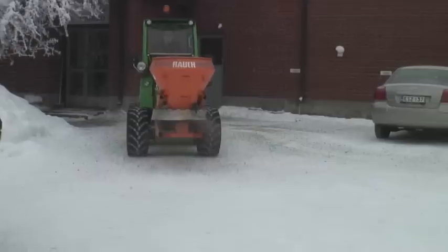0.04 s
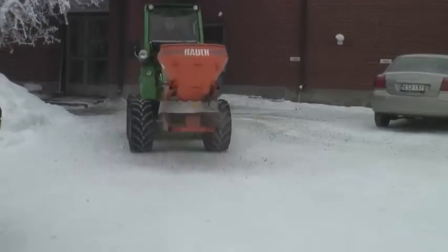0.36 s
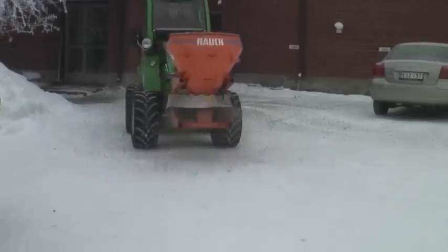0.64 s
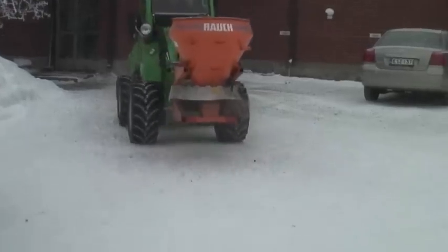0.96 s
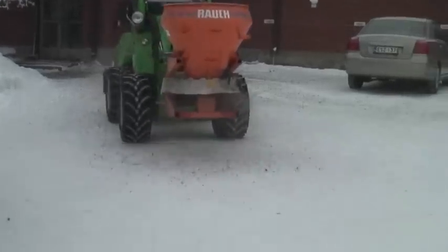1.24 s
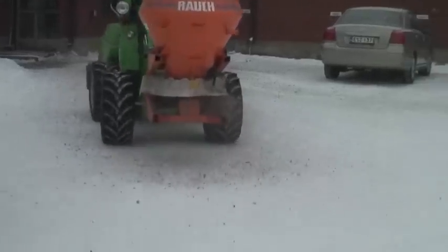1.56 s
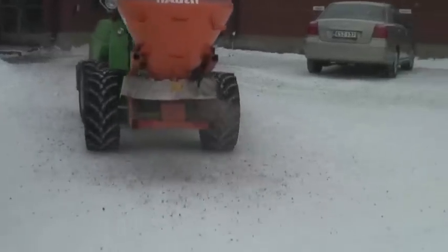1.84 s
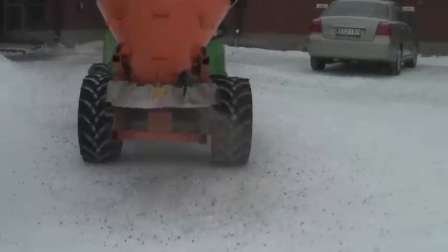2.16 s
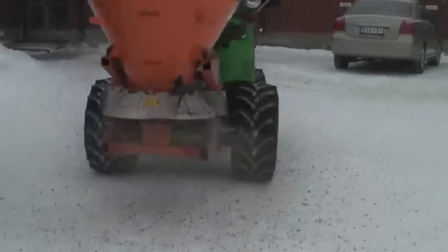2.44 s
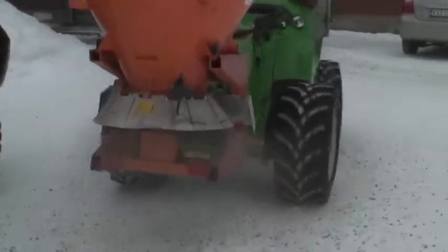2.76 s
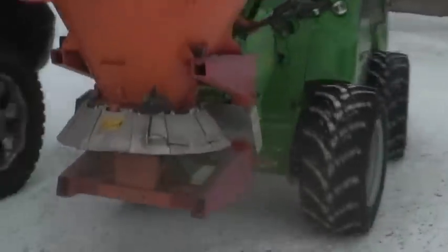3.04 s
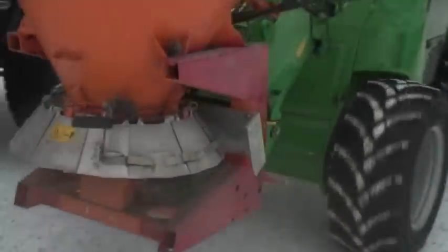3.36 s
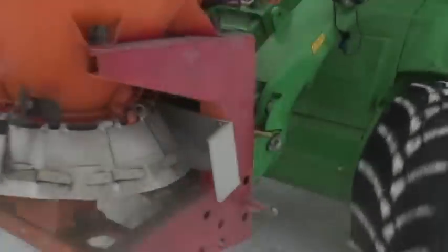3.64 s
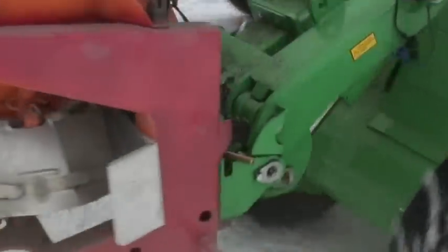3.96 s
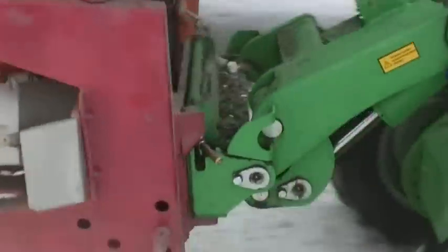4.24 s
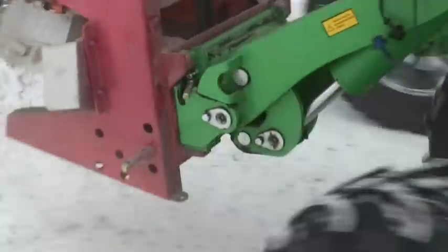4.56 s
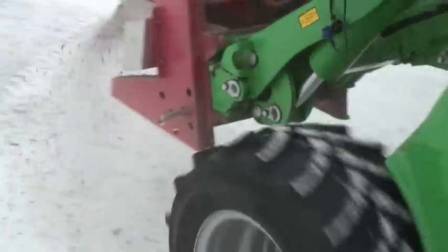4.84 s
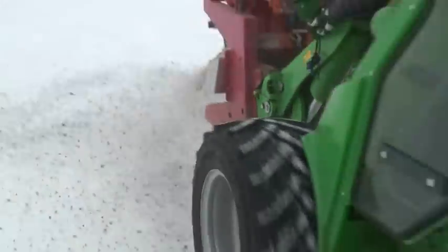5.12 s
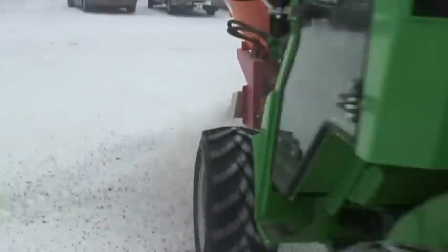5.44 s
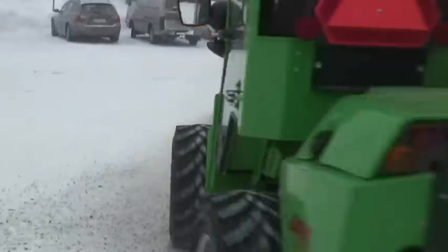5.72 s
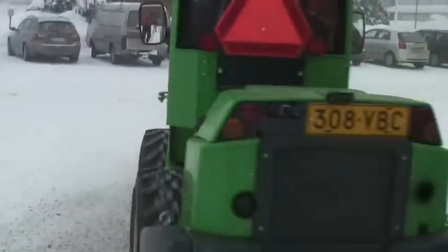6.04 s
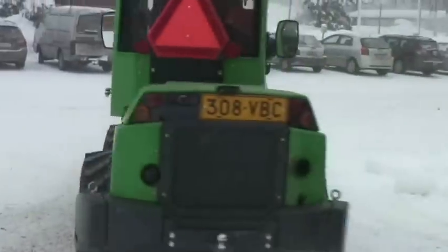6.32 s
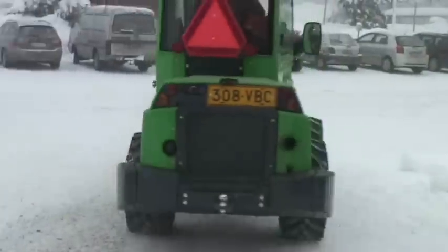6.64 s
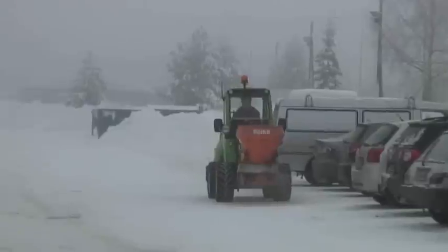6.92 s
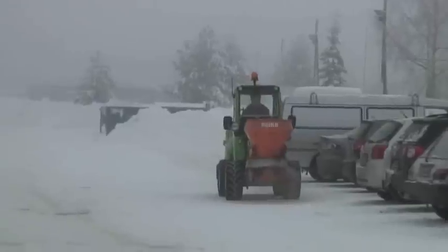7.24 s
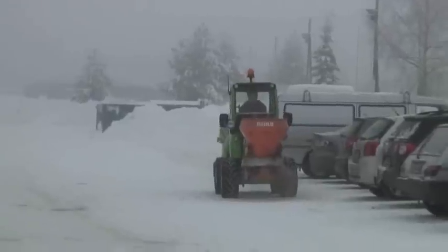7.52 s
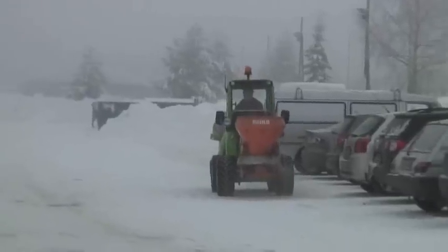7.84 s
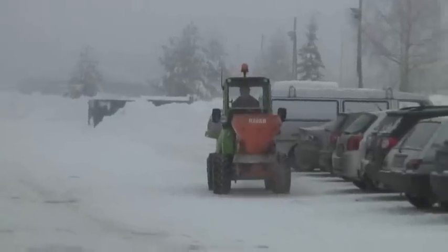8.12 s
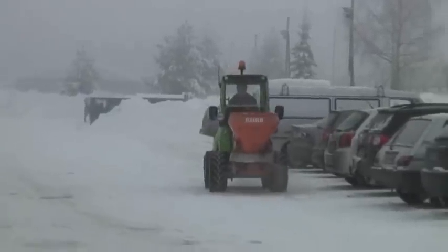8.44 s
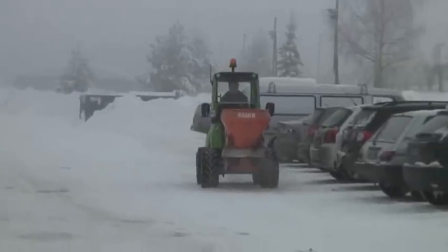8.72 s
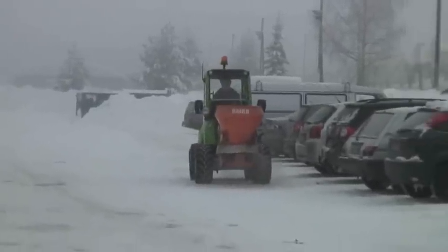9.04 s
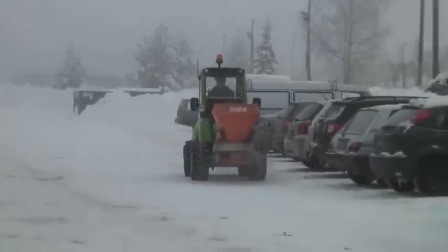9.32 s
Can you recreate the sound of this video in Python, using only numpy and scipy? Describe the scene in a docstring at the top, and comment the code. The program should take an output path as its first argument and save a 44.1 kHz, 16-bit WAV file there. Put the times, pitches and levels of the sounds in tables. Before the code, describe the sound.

Grit hisses steadily from the spinning disc of a spreader, with stones clacking and pinging on its steel, as a compact diesel loader drones closer across a snowy lot. It passes right by the microphone: the hiss fades and dulls while the cooling fan swells to a roar and whine. Then the sound cuts abruptly to the loader farther off, approaching again with its engine hum and rattling grit.

```python
"""Grit hisses and stones clack on the steel vanes and hood of a spinning spreader disc, ringing the metal.
The compact diesel loader carrying it drives up and past on a snowy lot. Firing pulses make the exhaust
drone; the cooling fan roars and its blades whine as the tail goes by.
At 6.81 s the loader is abruptly far off, approaching again."""
import sys
import numpy as np
from scipy import signal
from scipy.fft import rfft, irfft, next_fast_len
from scipy.io import wavfile
from scipy.ndimage import uniform_filter1d, map_coordinates

SR = 44100
rng = np.random.default_rng(int(sys.argv[2]) if len(sys.argv) > 2 else 0)


def dump(signal):
    """Clip the signal to [-1, 1] and save it as 16-bit WAV at the path in sys.argv[1]."""
    limited = np.clip(np.atleast_2d(signal).T, -1, 1)
    pcm = np.round(limited * 32767).astype(np.int16)
    wavfile.write(sys.argv[1], SR, pcm)


N = 422478
TIME_S = np.arange(N) / SR
JUMP_S = 6.81  # near pass before, far approach after
HOOD_TOP_HZ, CLICK_EDGE_HZ = 2400, 5300  # top of the hood's modes; a stone's clack/click divide

# Grit, fan air and exhaust noise spectra: (frequency [Hz], relative density [dB])
GRIT_NEAR_SPECTRUM = [(400, -11.5), (700, -9), (1000, -8.5), (1350, -8.5), (1600, -4.5), (2600, -3.5),
                      (4300, 0), (6500, 1), (8400, -0.5), (9800, -4.5), (11000, -12), (12000, -16.5),
                      (13200, -13), (14300, -12), (15400, -11)]
GRIT_FAR_SPECTRUM = [(600, -21), (1300, -10), (1600, -2), (2800, 2.5), (4000, 2.5), (5000, -0.5),
                     (5800, -4.5), (7400, 2), (8800, -1.5), (9500, -5.5), (11000, -13.5), (13000, -12.5),
                     (15300, -17)]
ROAR_SPECTRUM = [(100, -9), (200, -4), (350, 1), (550, 0.5), (800, -2), (1100, -4.5), (1700, -4),
                 (2500, -6.5), (3300, -5.5), (4200, -9), (4900, -14.5), (9000, -22.5), (12000, -46)]
RUMBLE_SPECTRUM = [(30, -13), (60, -1.5), (82, -3.5), (130, 4), (165, 1), (215, -3), (280, -3.5),
                   (360, -7.5), (520, -8.5), (700, -17.5), (1500, -66)]
# Post, front wheel and cab masking the disc: (time [s], half-width [s], loss [dB])
DISC_SHADOWS = [(4.425, 0.075, 5.5), (5.06, 0.05, 4), (5.5, .2, 4)]
# Big stones on the vanes: (time [s], relative clack [dB], relative click [dB], rise [s])
STONE_HITS = [(0.119, -18, -13, 0.0024), (.2114, -22, -12, .002), (.308, -19, -22, .001),
              (.461, -18, -12, .002), (.53, -30, -21, 0.00093), (.816, -34, -20, .001),
              (1.078, -16.5, -13, .002), (1.155, -27, -13, .002), (1.4546, -24, -16, .001),
              (1.541, -35, -13, .001), (1.6445, -35, -16, .001), (1.829, -16, -14, 0.0033),
              (2.4144, -20, -16, .001), (2.7017, -23, -29, .001), (2.972, -19, -27, .001),
              (3.096, -23, -19, .001), (3.4243, -15, -16, 0.0018), (3.852, -22, -12, .001),
              (4.1628, -25, -17, .002), (4.817, -29, -9, .0019), (6.8541, -28, -22, .002),
              (6.8999, -13.5, -11.5, .0005), (6.985, -26, -22, 0.0018), (7.062, -23.5, -22, .0004),
              (7.1761, -18, -16.5, .004), (7.4162, -17, -17, 0.0041), (7.452, -11.5, -21, .0008),
              (7.5552, -24, -23, .002), (7.6057, -18.5, -15, .0004), (7.6875, -23, -19, .002),
              (8.042, -26, -18, 0.0022), (8.1009, -23, -18, .002), (8.121, -13, -15, 0.0054),
              (8.1742, -22, -20, 0.0021), (8.2733, -24, -17, .002), (8.4641, -25, -17, .002),
              (8.557, -15.5, -14, 0.0037), (8.6721, -8.5, -6.5, 0.011), (8.9088, -14, -14, 0.0051),
              (9.067, -25, -18, .002), (9.129, -25, -16, .0021), (9.1644, -14.5, -11.5, 0.00049),
              (9.2191, -21, -23, .002), (9.3641, -29, -16, 0.00039), (9.414, -17, -11.5, .0004),
              (9.5318, -10.5, -12.5, 0.00081)]
# Disc and hood modes: (frequency [Hz], width [Hz], relative near level [dB], relative far level [dB])
STEEL_MODES = [(1165, 18, -3, -5), (1500, 50, -8, -6), (1614, 20, -7, -3), (1715, 22, -4, -4),
               (2088, 24, -3, -3), (2282, 22, -7, -12), (2700, 35, -12, -6), (2820, 40, -12, -9),
               (3108, 30, -6, -8), (3789, 40, -14, -7), (4036, 45, -8, -3), (4155, 45, -7, -9),
               (4328, 50, -11, -12), (5060, 70, -14, -12), (5495, 110, -8, -9), (6165, 90, -4, -3),
               (6740, 70, -14, -20), (7335, 110, -8, -2.5), (7902, 90, -9, -3.5), (8275, 110, -6, -9),
               (8920, 90, -7, -11), (9730, 100, -14, -10), (10430, 80, -8, -6), (12900, 90, -7, -6),
               (14750, 70, -9, -5), (14930, 45, -5, -2), (15470, 70, -5, -4)]
# Hood's low modes, fading as its open side turns away: (time [s], gain [dB])
HOOD_GAIN = [(0, 7), (.85, 1), (1.1, 1.5), (2.5, 1), (3.5, 2), (4.2, -15), (6.8, -12), (6.82, 1)]
# Knocks on the spreader frame: (time [s], relative level [dB], most excited pitch [Hz])
FRAME_KNOCKS = [(1.0, -25, 2090), (1.13, -21, 2090), (1.4, -26, 2090), (1.457, -22, 4800),
                (1.83, -22, 2090), (2.41, -23, 2090), (2.56, -25, 2090), (2.938, -17, 2790),
                (2.94, -22, 1715), (2.974, -17, 1615), (2.975, -20, 2290), (3.43, -24, 2090),
                (4.819, -12.5, 4030), (7.456, -18, 1900), (7.607, -22, 4030), (8.56, -23, 1615),
                (8.68, -23, 2790), (9.365, -19, 7364), (9.535, -20, 7364)]
# Frame modes: (frequency [Hz], relative level [dB], t60 [s])
FRAME_MODES = [(1480, 0, .12), (1615, 0, .11), (1715, 0, .12), (2090, 0, .18), (2290, -4, .1),
               (2790, 0, .16), (4030, 0, .11), (4800, 0, .08), (6115, -1, .08), (7364, 0, .07),
               (7902, -3, .06)]
# Engine speed: (time [s], firing rate [Hz])
FIRING_RATE = [(0, 57.76), (2.75, 57.73), (3.1, 54.44), (3.5, 53.1), (3.9, 56), (4.5, 54.15), (5.25, 55.75),
               (5.52, 55.1), (5.65, 53.54), (6.0, 55.2), (6.2, 54.87), (6.4, 52.8), (6.79, 51.12),
               (6.84, 56.43), (7.7, 55.64), (8.7, 57.64), (9.55, 58.1)]
# Exhaust drone: (time [s], firing tone [dB], octave [dB])
NEAR_DRONE = [(0, -28, -27), (1.0, -22, -24.5), (1.26, -24, -33), (1.8, -26, -26), (2.6, -31.5, -28.5),
              (3.5, -30, -27), (3.8, -34, -32), (4.28, -33, -32), (4.8, -29, -25), (5.3, -22.5, -31.5),
              (5.8, -23.5, -28), (6.79, -22.5, -28)]
DISTANT_DRONE = [(6.84, -32, -26.5), (7.6, -31, -23.5), (8.1, -33.5, -26), (8.5, -30, -24.5),
                 (9.55, -24, -23.5)]
# Whine through engine cover gaps: (time [s], blade tone [dB], 3rd harmonic [dB], 5th harmonic [dB])
COVER_GAPS = [(3.1, -43, -50, -60), (4.52, -38, -43, -55), (4.87, -37, -43, -50), (5.11, -34, -40, -52),
              (5.33, -37, -31, -48), (5.53, -27, -38, -33.5), (5.66, -24.5, -30.5, -32.5)]
# Engine booms: (time [s], order [x firing rate], level [dB])
ENGINE_BOOMS = [(4.95, 6, -38.5), (5.75, 4, -31), (6.1, 3, -39)]
# Drive hiss: (time [s], band centre [Hz])
HISS_CENTRE = [(5.2, 3920), (5.65, 4060), (6.1, 3910), (6.4, 4070), (6.75, 4250)]
# Source directions: (time [s], left lead [samples], left minus right [dB])
SPREADER_PAN = [(0, 0, -.4), (2.7, 0, .5), (3.6, .7, .6), (3.9, 2.4, 1.5), (4.25, 3.1, 2.4),
                (4.85, 2.4, 1.5), (5.15, .4, -1), (5.75, .2, -1), (6.4, -.5, 0), (6.8, 0, -.2)]
ENGINE_PAN = [(0, 0, -.3), (3.4, 0, -.5), (4.3, -2.2, -4.5), (5.2, -4.8, -4), (5.7, -4.7, -2.6),
              (6.1, -3.2, -1.3), (6.35, -1.7, -.6), (6.8, 0, -.8)]
# Left-right likeness beside a wall, in the open, and of the fan air: (frequency [Hz], coherence [0-1])
WALL_COHERENCE = [(60, .96), (300, .97), (600, .985), (1300, .99), (2400, .96), (5000, .84), (10000, .75),
                  (12000, .4), (15000, .55)]
OPEN_COHERENCE = [(60, .96), (1650, .999), (4000, .995), (8000, .975), (10000, .95), (12000, .6),
                  (15000, .7)]
FAN_COHERENCE = [(100, .94), (350, .92), (700, .95), (1500, .97), (5000, .85)]
# Channel colour: (frequency [Hz], left minus right [dB])
CHANNEL_TILT = [(100, 1.8), (250, .6), (1000, .3), (4000, .2), (8000, .5), (14000, 2)]


def grit(far, near_db=-18, far_db=-25, approach_db_per_s=1.22, sizzle_db=3):
    """Small stones stream over the disc; the passing machine shades and dulls them."""
    shadow_db = sum(db * bell(s, width_s) for s, width_s, db in DISC_SHADOWS)
    turn_db = 8 * ramp(at_s=4.98, length_s=2.23)  # disc turns away
    hide_db = 22 * np.maximum(TIME_S - 5.68, 0)  # body hides it
    dull_db = 16 * ramp(at_s=5.45, length_s=1.1) * (1 - far)
    near_gain = amp(near_db - shadow_db - turn_db - hide_db)
    far_gain = amp(far_db + approach_db_per_s * (TIME_S - JUMP_S))
    flow = blend(near_gain, far_gain, far) * amp(0.7 * wobble(7))
    chips = .19 * tinkle()
    close = impacts(per_s=16000, scatter_db=2.5)
    close *= clumps(per_s=170, life_s=0.004, scatter_db=0, steady=0.79)
    distant = impacts(per_s=20000, scatter_db=0.5)
    distant *= clumps(per_s=130, life_s=0.005, scatter_db=2.8, steady=0.7)
    close = stereo(close + chips, GRIT_NEAR_SPECTRUM, WALL_COHERENCE)
    distant = stereo(distant + chips, GRIT_FAR_SPECTRUM, OPEN_COHERENCE)
    body, sizzle = split(blend(close, distant, far), edge_hz=10000)
    bent, shaded = split(stereo_width(body) + amp(sizzle_db) * sizzle, edge_hz=12000)
    return flow * (bent + amp(-dull_db) * shaded)


def clumps(per_s, life_s, scatter_db, steady):
    """Envelope of grit dropping in clumps: sharp onsets decay over a steady trickle."""
    drops = (rng.random(N) < per_s / SR) * amp(scatter_db * np.clip(rng.standard_normal(N), -2, 2))
    power = signal.lfilter([1], [1, -np.exp(-1 / (life_s * SR))], drops)
    mean_power = uniform_filter1d(power, SR // 3) + 1e-9
    return unit(np.sqrt(steady + power / mean_power))


def tinkle(count=3300, samples=1500, t60_s=0.06, scatter_db=2.5):
    """Single chips bounce off the steel, each ringing near one mode."""
    when, pick, detune, strength = rng.random((count, 4)).T[:, :, None]
    mode = (pick ** .6 * (len(STEEL_MODES) - 1)).astype(int)
    hz = np.array(STEEL_MODES)[mode, 0] * (.975 + .05 * detune)
    t = np.arange(samples) / SR
    notes = amp(-scatter_db * np.log(strength + .05) - 60 * t / t60_s) * np.sin(2 * np.pi * hz * t)
    index = (when * (2 * N - samples)).astype(int) + np.arange(samples)
    return unit(np.bincount(index.ravel(), notes.ravel(), 2 * N).reshape(2, N))


def stereo_width(pair, side_cut_db=14, side_boost_db=8):
    """The grit's stereo image is nearly mono for two seconds, then opens, widest near 4.1 s."""
    mid = pair.mean(axis=0)
    side_db = side_boost_db * passing(4.1, 24, 1) - side_cut_db * (1 - ramp(at_s=2, length_s=.6))
    return mid + amp(side_db) * (pair - mid)


def stones(far, rattle_s=0.012, tail_s=0.032, tail_db=-12, near_db=-5, far_db=-3.5):
    """A big stone rattles between vane and hood, then its fragments scatter."""
    clack_gain, click_gain = np.zeros((2, N + SR))
    t = np.arange(SR // 4) / SR
    decay = np.exp(-(t / rattle_s) ** 2) + amp(tail_db) * np.exp(-t / tail_s)
    for s, clack_db, click_db, rise_s in STONE_HITS:
        burst = (1 - np.exp(-(t / rise_s) ** 2)) * decay
        add_at(clack_gain, s, amp(clack_db) * burst)
        add_at(click_gain, s, amp(click_db) * burst)
    contacts = stereo(impacts(per_s=16000, scatter_db=3), GRIT_FAR_SPECTRUM, OPEN_COHERENCE)
    clack, click = split(contacts, CLICK_EDGE_HZ)
    bursts = unit(clack) * clack_gain[:N] + unit(click) * click_gain[:N]
    return amp(blend(near_db, far_db, far)) * bursts


def steel_ring(clicks, far, ring_gain=1.32, wander_db=2.5):
    """Clicks plus disc and hood resonance; modes flare and fade as the stream wanders."""
    out = clicks
    hood_db, = curves(HOOD_GAIN)
    for hz, width_hz, near_db, far_db in STEEL_MODES:
        db = blend(near_db, far_db, far) + hood_db * (hz < HOOD_TOP_HZ) + wander_db * wobble(20)
        resonator = signal.iirpeak(hz, hz / width_hz, SR)
        out = out + signal.lfilter(*resonator, ring_gain * amp(db) * clicks)
    return out


def stone_pings(ring_db=-8.5, scatter_db=5, hood_loss_db=5, t60_s=.075):
    """Each big stone rings a new mix of steel modes; the hood's low ones answer less."""
    out, t = np.zeros(N + SR), np.arange(SR // 4) / SR
    for s, clack_db, click_db, rise_s in STONE_HITS:
        attack = 1 - np.exp(-(t / rise_s) ** 2)
        for hz, _, _, mode_db in STEEL_MODES[1:22]:
            db = ring_db + mode_db + scatter_db * np.clip(rng.normal(), -2, 1.3)
            db -= hood_loss_db * (hz < HOOD_TOP_HZ)
            db += clack_db if hz < CLICK_EDGE_HZ else click_db
            add_at(out, s, attack * damped_sine(t, hz, db, t60_s))
    return out[:N]


def frame_clanks(gain_db=-1, rise_s=0.0025, falloff_db_per_octave=22):
    """A knock rings the frame modes near one pitch, set by where it lands."""
    out, t = np.zeros(N + SR), np.arange(SR // 3) / SR
    attack = 1 - np.exp(-t / rise_s)
    for s, knock_db, pitch_hz in FRAME_KNOCKS:
        for hz, mode_db, t60_s in FRAME_MODES:
            loss_db = falloff_db_per_octave * abs(np.log2(hz / pitch_hz))
            db = gain_db + knock_db + mode_db - loss_db + rng.normal()
            add_at(out, s, attack * damped_sine(t, hz, db, t60_s))
    return out[:N]


def exhaust(phase, far, far_rumble_db=-31, stereo_lag_rad=0.11, hum_order=4.5):
    """Each firing pushes a smooth pulse and a turbulent puff from the pipe; a faint hum carries far."""
    firing_db, octave_db = blend(curves(NEAR_DRONE), curves(DISTANT_DRONE), far)
    ear_phase = phase + np.array([[.5], [-.5]]) * stereo_lag_rad
    pulse = np.cos(ear_phase) + amp(-19.5) * np.cos(3 * ear_phase)
    firing = amp(firing_db + 1.06 * wobble(13)) * pulse
    octave = amp(octave_db + 1.6 * wobble(12)) * np.cos(2 * ear_phase)
    hum = far * amp(octave_db - 19 + 1.9 * wobble(6.7)) * np.cos(hum_order * ear_phase)
    front = amp(-31.5 - 1.5 * TIME_S)  # hopper shades the pipe
    abreast = amp(-27.5) * passing(at_s=6.46, fall_db_per_s=17.5, round_s=2.6)
    hopper_shade = amp(-5 * bell(at_s=4.2, width_s=0.58))
    rumble_gain = blend(hopper_shade * np.hypot(front, abreast), amp(far_rumble_db), far)
    turbulence = rng.standard_normal((2, N)) * (1 + 0.046 * np.cos(phase))
    puffs = stereo(turbulence, RUMBLE_SPECTRUM, WALL_COHERENCE)
    return np.sqrt(2) * (firing + octave + hum) + rumble_gain * placed(puffs, ENGINE_PAN)


def fan_roar(phase, far, abreast_db=-18, far_db=-41.5, hiss_relative_db=-12.5):
    """Cooling air roars out, carrying diesel clatter and drive hiss."""
    front = amp(-40 - 5 * TIME_S)  # hopper shades the fan
    abreast = amp(abreast_db) * passing(at_s=6.114, fall_db_per_s=12, round_s=0.26)
    gain = blend(np.hypot(front, abreast), amp(far_db), far)
    air = rng.standard_normal((2, N))
    clatter = .5 * impacts(per_s=1200, scatter_db=6) * (1 + 0.22 * np.cos(phase))
    roar = snow_bounce(stereo(air + clatter, ROAR_SPECTRUM, FAN_COHERENCE), far)
    return gain * (roar + amp(hiss_relative_db) * drive_hiss())


def fan_whine(phase, far, order=9, faint_db=-49, grille_db=-19, overtone_relative_db=-18):
    """Blade tone locked to the engine: faint ahead, louder at cover gaps, loudest at the tail grille."""
    gaps = [np.outer(amp(dbs), passing(s, fall_db_per_s=130, round_s=.085)) for s, *dbs in COVER_GAPS]
    leak, third_leak, fifth_leak = np.max(gaps, axis=0)
    side = blend(np.hypot(amp(faint_db), leak), amp(faint_db), far)
    grille_open = ramp(at_s=6.17, length_s=0.055) * (1 - far)
    grille = amp(grille_db) * grille_open * passing(at_s=6.44, fall_db_per_s=36, round_s=0.45)
    blade_phase = order * phase + .1 * wobble(45)
    tone = np.hypot(side, grille) * amp(1.4 * wobble(22)) * np.sin(blade_phase)
    grille_overtone = amp(overtone_relative_db) * grille
    third = np.hypot(third_leak, grille_overtone) * np.sin(3 * blade_phase)
    fifth = np.hypot(fifth_leak, grille_overtone) * np.sin(5 * blade_phase)
    return np.sqrt(2) * (tone + amp(1.5 * wobble(12)) * (third + fifth))


def engine_booms(phase):
    """Higher engine orders boom briefly and unsteadily as the body passes."""
    out = np.zeros(N)
    for s, order, db in ENGINE_BOOMS:
        tone = np.sqrt(2) * np.cos(order * phase + .5 * wobble(30))
        out += amp(db) * passing(s, fall_db_per_s=55, round_s=0.26) * tone
    return out


def drive_hiss(half_width_hz=160):
    """Narrow drifting hiss from the drive, probably hydraulic."""
    centre_hz, = curves(HISS_CENTRE)
    noise = stereo(rng.standard_normal((2, N)), spectrum=[(100, 0)], coherence=[(100, .9)])
    band, _ = split(noise, half_width_hz)
    return unit(band * np.cos(2 * np.pi * np.cumsum(centre_hz) / SR))


def snow_bounce(pair, far, reflection=.3):
    """Adds a dull reflection off packed snow; its delay moves with distance, sweeping the colour."""
    closest_s, closest_m, speed_m_per_s = 5.6, 1.93, 2.23
    ear_m, fan_m = 1.5, .6  # heights
    distance_m = np.hypot(closest_m, speed_m_per_s * (TIME_S - closest_s))
    detour_m = np.hypot(distance_m, ear_m + fan_m) - np.hypot(distance_m, ear_m - fan_m)
    delayed_index = np.arange(N) - detour_m / 343 * SR
    dull, _ = split(pair, edge_hz=1800)
    bounce = np.array([map_coordinates(side, [delayed_index]) for side in dull])
    return pair + reflection * (1 - far) * bounce


def impacts(per_s, scatter_db):
    """Two trains of tiny contacts, random in time and size."""
    hit = rng.random((2, N)) < per_s / SR
    return unit(hit * rng.choice([-1, 1], (2, N)) * amp(scatter_db * rng.standard_normal((2, N))))


def damped_sine(t, hz, db, t60_s):
    """One decaying mode, random phase."""
    return amp(db - 60 * t / t60_s) * np.sin(2 * np.pi * (hz * t + rng.random()))


def stereo(pair, spectrum, coherence):
    """Two unrelated signals to a coloured, partly coherent left and right, rms 1."""
    def response(hz):
        angle = np.arccos(np.clip(along(coherence, hz), 0, 1)) / 2
        return amp(along(spectrum, hz)) * np.array([np.cos(angle), np.sin(angle)])
    mid, side = filtered(pair, response)
    return unit(np.array([mid + side, mid - side]))


def placed(pair, pan):
    """The nearer ear hears a source earlier and louder."""
    lead_samples, tilt_db = curves(pan)
    return np.array([amp(side * tilt_db) * map_coordinates(x, [np.arange(N) + side * lead_samples])
                     for x, side in zip(pair, (.5, -.5))])


def passing(at_s, fall_db_per_s, round_s):
    """Pass-by gain: rounded peak of 1, falling on both sides."""
    return amp(-fall_db_per_s * (np.hypot(TIME_S - at_s, round_s) - round_s))


def ramp(at_s, length_s):
    """0 to 1, centred on at_s."""
    return np.clip((TIME_S - at_s) / length_s + .5, 0, 1)


def bell(at_s, width_s):
    """Gaussian bump, peak 1."""
    return np.exp(-((TIME_S - at_s) / width_s) ** 2)


def blend(near, distant, far):
    """Crossfade: near at far = 0, distant at 1."""
    return (1 - far) * near + far * distant


def wobble(knots_per_s):
    """Slow random curve."""
    knots = rng.standard_normal(int(N * knots_per_s / SR) + 4)
    return np.interp(np.arange(N) * knots_per_s / SR, np.arange(len(knots)), knots)


def curves(rows):
    """Per-sample values of each column after the time."""
    times_s, *columns = np.transpose(rows)
    return np.array([np.interp(TIME_S, times_s, column) for column in columns])


def along(points, hz):
    """(frequency [Hz], value) points read on a log axis."""
    knots_hz, values = np.transpose(points)
    return np.interp(np.log(hz + 1), np.log(knots_hz + 1), values)


def filtered(x, response):
    """Apply a frequency response."""
    size = next_fast_len(N + SR // 2)
    return irfft(rfft(x, size) * response(np.fft.rfftfreq(size, 1 / SR)), size)[..., :N]


def split(x, edge_hz):
    """Parts below and above an edge."""
    low = filtered(x, lambda hz: 1 / (1 + (hz / edge_hz) ** 12))
    return low, x - low


def add_at(track, at_s, sound):
    """Mix in place."""
    track[round(at_s * SR):][:len(sound)] += sound


def amp(db):
    """Decibels to gain."""
    return 10 ** (np.asarray(db) / 20)


def unit(x):
    """Scale to rms 1."""
    return x / np.sqrt(np.mean(x ** 2) + 1e-20)


def scene():
    """Spreader in front, engine behind, travelling together."""
    firing_hz, = curves(FIRING_RATE)
    phase = 2 * np.pi * np.cumsum(firing_hz) / SR
    far = ramp(JUMP_S, length_s=0.0057)
    spreader = steel_ring(grit(far) + stones(far), far) + stone_pings() + frame_clanks()
    pipe = exhaust(phase, far)
    engine = fan_roar(phase, far) + fan_whine(phase, far) + engine_booms(phase)
    return placed(spreader, SPREADER_PAN) + pipe + placed(engine, ENGINE_PAN)


def record(dry, ceiling=.9, top_hz=15750):
    """Slight left-right colour, rounded peaks, band limit."""
    pair = filtered(dry, lambda hz: amp(along(CHANNEL_TILT, hz) * np.array([[.5], [-.5]])))
    rounded = pair / (1 + np.abs(pair / ceiling) ** 6) ** (1 / 6)
    return filtered(rounded, lambda hz: hz < top_hz)


dry = scene()
out = record(dry)
dump(out)
```